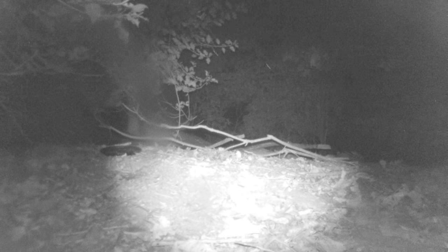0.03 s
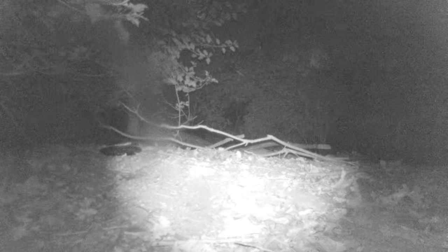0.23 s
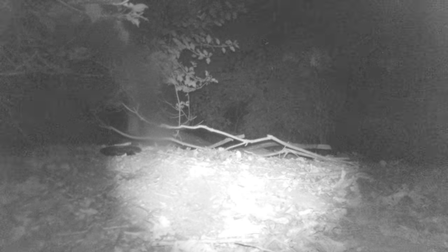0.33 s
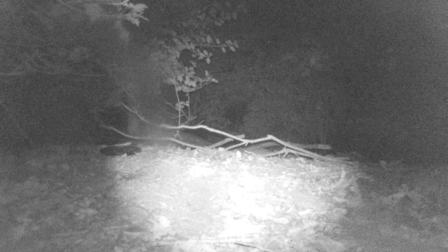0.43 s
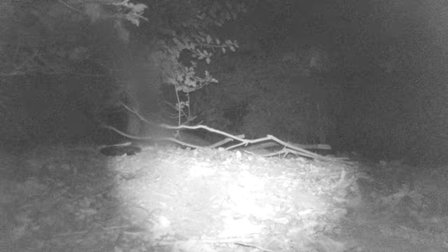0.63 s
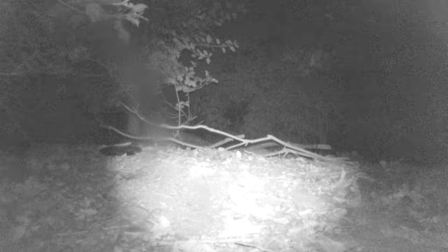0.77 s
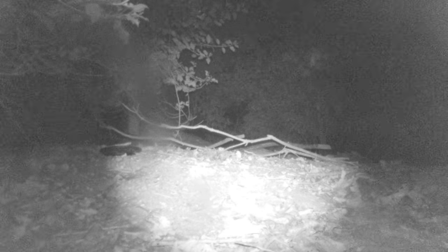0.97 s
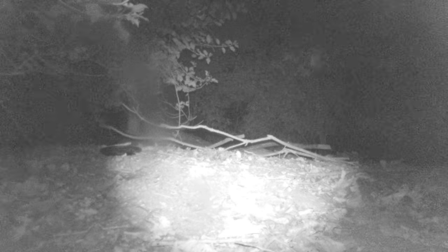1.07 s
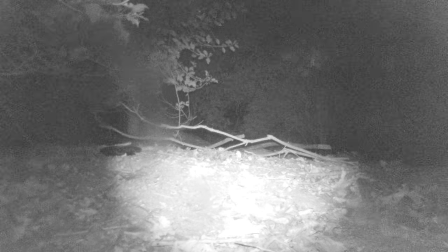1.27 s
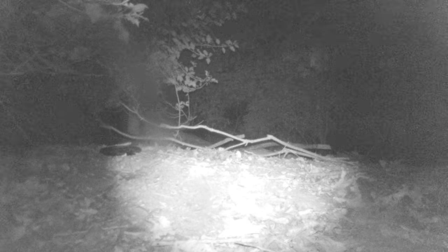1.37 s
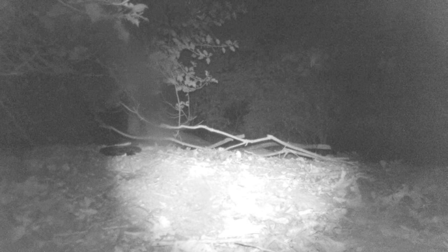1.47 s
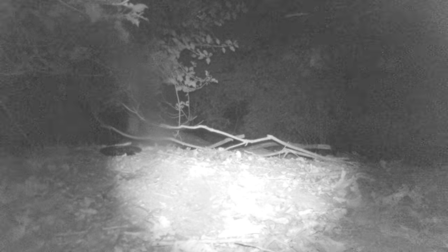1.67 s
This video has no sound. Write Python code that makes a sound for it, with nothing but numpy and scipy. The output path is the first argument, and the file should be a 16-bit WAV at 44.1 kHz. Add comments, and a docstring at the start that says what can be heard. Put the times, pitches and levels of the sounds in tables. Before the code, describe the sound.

Short, raspy squeals from squabbling badger cubs, then leaves rustling and twigs snapping.

```python
"""Badger cubs squabbling in a night wood

Yelps are quick pitch arches from unevenly beating vocal folds, part rasp, part squeal, with low
grunts and throat clicks between. Paws scuff dry leaves, snap twigs and thud on earth; trees scatter
a faint tail over steady hiss and hum. A small, close microphone rings near 5 kHz and passes little
above it; the loud yelps overload the recorder."""
import sys
import numpy as np
from scipy import signal
from scipy.fft import rfft, irfft
from scipy.io import wavfile
from scipy.ndimage import uniform_filter1d

SR = 44100
rng = np.random.default_rng(int(sys.argv[2]) if len(sys.argv) > 2 else 0)


def dump_mix(stems):
    """Bounce the given channels to the path in sys.argv[1] as a 16-bit WAV at rate SR."""
    frames = np.atleast_2d(stems).T  # one column per channel
    limited = np.clip(frames, -1, 1)  # hard clip at full scale
    pcm = np.round(limited * 32767).astype(np.int16)
    wavfile.write(sys.argv[1], SR, pcm)


N = 74970
TIME_S = np.arange(N) / SR


def voice(tilt_db_per_oct, contour, n_lines=24):
    """Folds beat unevenly; alternating strong and weak beats add half lines; air rasps in step."""
    # Throat and mouth response: (frequency [Hz], gain [dB])
    throat = [(200, -24.5), (400, -6.5), (700, -11), (1100, -6.5), (1500, -17), (1900, -5), (2350, -0.5),
              (2700, -4), (3200, -9), (3800, -13.5), (4450, -11), (5300, -32)]
    # Upper resonances that a wider gape lifts: (frequency [Hz], weight [dB])
    gape_band = [(2550, -25), (3050, 1.5)]
    # Rasping air: (frequency [Hz], level [dB])
    air_spectrum = [(60, -10), (500, -1.5), (1400, 1.5), (2300, 1.5), (3500, 5.5), (4700, 4.5), (5600, -18)]
    jitter, shimmer_db, rasp_gain = 0.069, 2.5, 0.72  # each scaled by roughness
    tremble_hz, tremble_rad, half_line_rough = 296, 0.51, 0.75
    waver_hz, waver_db, waver_rad = 40, 2, 0.45
    soft_below_db, pressed_db, edge_s = -12.5, 6, 0.00061

    knots_s, *columns = np.transpose(contour)
    size = SR // 8
    start = int(knots_s[0] * SR) - SR // 200
    t = TIME_S[start:start + size]
    pitch_hz, level_db, doubling, rough, gape_db = (np.interp(t, knots_s, c) for c in columns)
    pitch_hz = pitch_hz * (1 + jitter * rough * drift(tremble_hz, t.shape))
    phase = 2 * np.pi * np.cumsum(pitch_hz) / SR
    harmonic = np.arange(1, n_lines + 1)[:, None] / 2
    is_half = harmonic % 1 > 0
    line_hz = harmonic * pitch_hz

    # Soft sounds leave a nearly closed mouth: duller.
    bright_db = tilt_db_per_oct - 2.67 * np.maximum(soft_below_db - level_db, 0)
    line_db = db_at(throat, line_hz) + bright_db * np.log2(harmonic)
    line_db += waver_db * drift(waver_hz, line_hz.shape)
    line_db += gape_db * from_db(db_at(gape_band, line_hz))
    # A pressed, period-doubled voice loses its fundamental.
    line_db -= pressed_db * doubling * (harmonic <= 1) / harmonic
    gains = from_db(line_db) * np.where(is_half, doubling, 1) * (line_hz < SR / 6)
    gains /= np.sqrt(np.sum(gains ** 2, axis=0) / 2)
    lag_rad = rng.uniform(0, np.pi, (n_lines, 1)) + waver_rad * drift(waver_hz, line_hz.shape)
    lag_rad += tremble_rad * (rough + half_line_rough * is_half) * drift(tremble_hz, line_hz.shape)
    tone = np.sum(gains * np.cos(harmonic * phase + lag_rad), axis=0)
    tone *= from_db(shimmer_db * rough * drift(tremble_hz, t.shape))

    air = noise(air_spectrum)
    air = air[:size] + (from_db(gape_db) - 1) * colour(air, gape_band)[:size]
    air /= np.sqrt(uniform_filter1d(air ** 2, size=256))
    rasp = rasp_gain * rough * air * (1 + np.cos(phase / 2)) * from_db(bright_db)

    outside_s = np.maximum(0, np.maximum(knots_s[0] - t, t - knots_s[-1]))
    envelope = from_db(level_db) * np.exp(-(outside_s / edge_s) ** 2)
    out = np.zeros(N)
    out[start:start + size] = envelope * (tone + rasp) / np.sqrt(1 + rough ** 2)
    return out


def yelps():
    """Short, loud calls that rise and fall in pitch."""
    # Calls: (mouth tilt [dB/octave], contour); contour rows:
    # (time [s], pitch [Hz], level [dB], period doubling [0-1], roughness [0-1], gape [dB])
    calls = [ (-6.5, [(.2065, 856, -14.5, 0, 0.1, -7), (.2115, 1104, -12, 0.2, 0.04, -4),
             (.218, 792, -15, 0.06, 0.54, -3), (.227, 520, -21.5, 0, 0.42, 2)]),
             (-2.5, [(.2645, 1143, -12, 0.14, 0.26, 2), (.268, 1203, -4.5, 0.6, 0.7, -3),
             (.276, 1400, -7, 1, 0.41, -1.5), (.286, 1404, -3.5, 0.37, 0.42, -2.5),
             (.295, 1180, -7.5, 0, 0.07, 8.5), (.301, 1120, -9, 0.24, 0.34, 8),
             (.312, 550, -36, 0, 0.7, 10)]), (-2.5, [(.355, 846, -26.5, 0, 0.1, 20),
             (.364, 1065, -5.5, 0, 0.16, -11), (.375, 1308, -7, 0.08, 0.25, 21),
             (.382, 1063, -6.5, 0.26, 0.17, -10), (.388, 920, -15.5, 0.07, 0.14, -19)]),
             (-1.5, [(.5695, 1225, -4.5, 0, 0.37, -17), (.5715, 1292, -8.5, 0.2, 0.16, 16.5),
             (.579, 1218, -4, 0, 0.2, 0.5), (.585, 1084, -5.5, 0.9, 0, -6),
             (.588, 970, -18.5, .2, 0.3, 14.5)]), (-3.5, [(.6165, 1066, -7, 1, 0.55, -11),
             (.619, 1113, -4, 1, 0.77, -10), (.627, 1131, -6.5, 0.97, 0.54, 1),
             (.638, 1284, -3.5, 0.65, 0.03, 5), (.656, 1222, -5.5, 1, 0.05, 7),
             (.665, 1081, -5, 1, 0.37, -5), (.670, 875, -17.5, .3, 0.4, 20), (.686, 398, -39.5, 0, .2, 2)]),
             (2.5, [(.7015, 1098, -26, 1, 0.1, -10), (.7035, 1150, -6, 1, 0.16, -13),
             (.713, 1125, -7.5, 0.7, 0.3, -1), (.723, 1245, -4.5, 0.2, 0, -6),
             (.735, 1085, -9.5, 0.1, .1, 5), (.740, 1023, -11, 0, 0.3, -8.5),
             (.746, 800, -34, 0.2, .2, -4)]), (-2.5, [(.776, 948, -14.5, 1, 0.7, 8.5),
             (.788, 1176, -10.5, 0.8, 0.66, 7.5), (.796, 1315, -12.5, 0.72, .5, 5),
             (.805, 1344, -8, 0, 0, 2), (.811, 1168, -12.5, 0.13, 0, 7), (.818, 957, -18.5, 0.06, 0, -5),
             (.822, 555, -24, 0, .3, -5)]), (1.5, [(.874, 1000, -16, 0.93, 0, 8.5),
             (.879, 1018, -10, 0.9, 0.48, -3), (.888, 1174, -9, 1, 0.22, 9.5),
             (.896, 1241, -10, 1, 0.55, 2), (.906, 1267, -5.5, 0.3, 0.03, -3.5),
             (.915, 1100, -16, .05, 0.2, 8), (.926, 486, -27, 0, 0.36, 7)]), ]
    return sum(voice(tilt, contour) for tilt, contour in calls)


def grunts():
    """Low, rough glides that fade as they go."""
    # Glides: (time [s], length [s], first pitch [Hz], last pitch [Hz], level [dB])
    glides = [(0.587, .016, 495, 387, -10.5), (0.742, 0.017, 637, 361, -16.5),
              (0.76, 0.027, 326, 475, -18.5), (0.995, .016, 535, 392, -33.5)]
    tilt_db_per_oct, rough, fade_db = 1, 0.62, 9.5
    out = np.zeros(N)
    for start_s, length_s, first_hz, last_hz, level_db in glides:
        first = (start_s, first_hz, level_db, 0, rough, 0)
        last = (start_s + length_s, last_hz, level_db - fade_db, 0, rough, 0)
        out += voice(tilt_db_per_oct, [first, last])
    return out


def throat_clicks():
    """Lone clicks ring two mouth resonances before the longest squeal."""
    # Clicks: (time [s], level [dB])
    clicks = [(.5995, -5.5), (.6065, -10), (.6120, -5)]
    # Mouth resonances: (frequency [Hz], gain [dB], decay [s])
    modes = [(2060, 1.5, 0.0015), (3660, -4, 0.0029)]
    return sum(from_db(db) * pings(clicks, hz, decay_s) for hz, db, decay_s in modes)


def leaves():
    """Paws push through leaves: each scuff swells and fades, bright crackle over dull crunch."""
    # Scuffs: (time [s], level [dB], rise [s], decay [s], crunch re crackle [dB])
    scuffs = [ (.005, -31.5, 0.038, 0.067, 3.5), (0.053, -29.5, 0.015, 0.039, 1),
              (0.121, -24.5, 0.0031, 0.0056, -13), (0.165, -25, 0.0021, 0.0071, 0),
              (0.187, -22.5, 0.0042, 0.024, -5.5), (0.254, -25, 0.021, 0.076, 0.5),
              (0.328, -31.5, 0.018, 0.0073, -9), (0.395, -28, 0.037, 0.014, -6.5),
              (0.508, -26.5, 0.028, 0.025, -2.5), (0.561, -22, 0.0069, 0.028, -2.5),
              (0.598, -27.5, 0.0055, 0.013, 7.5), (0.684, -17.5, 0.011, 0.0091, -5),
              (0.761, -36, .02, 0.08, -19.5), (0.839, -34.5, 0.063, 0.031, 1.5),
              (0.961, -30.5, 0.038, 0.031, -1), (1.019, -31.5, 0.024, 0.01, 0),
              (1.11, -17.5, .003, 0.0042, -22.5), (1.133, -23, 0.025, 0.041, -0.5),
              (1.206, -19.5, 0.04, 0.011, -2.5), (1.250, -25, 0.045, 0.036, 0.5),
              (1.299, -29, 0.018, 0.034, 1), (1.355, -19.5, 0.013, 0.039, 1),
              (1.412, -31.5, 0.008, 0.053, 4.5), (1.462, -26, 0.015, 0.021, -5.5),
              (1.517, -34.5, 0.0081, 0.024, -2.5), (1.57, -31.5, 0.015, 0.011, -1),
              (1.614, -29.5, 0.023, 0.041, -2.5), (1.663, -28.5, 0.027, 0.034, -2)]
    # Bright crackle: (frequency [Hz], level [dB])
    crackle_spectrum = [(1000, -20.5), (2500, -23), (3700, 2), (4700, 8.5), (6000, -10.5)]
    # Dull crunch: (frequency [Hz], level [dB])
    crunch_spectrum = [(60, -20.5), (200, -8.5), (700, -4), (1300, 1), (2400, 1), (3500, 0.5), (5000, -25)]
    peak_s, level_db, rise_s, decay_s, crunch_db = np.transpose(scuffs)[:, :, None]
    age_s = TIME_S - peak_s
    swells = from_db(level_db) * np.exp(-np.maximum(-age_s / rise_s, age_s / decay_s))
    crackle = np.linalg.norm(swells, axis=0) * fractures(crackle_spectrum)
    crunch = np.linalg.norm(swells * from_db(crunch_db), axis=0) * fractures(crunch_spectrum)
    return crackle + crunch


def fractures(spectrum, rate_per_s=2500, spread_db=5.5, hiss_gain=0.58):
    """Tiny leaf fractures of uneven size over a soft rubbing hiss; rms 1."""
    sizes = from_db(spread_db * np.minimum(rng.exponential(1, N), 3)) * rng.choice([-1, 1], N)
    clicks = unit_rms(sizes * (rng.random(N) < rate_per_s / SR))
    return unit_rms(colour(clicks + hiss_gain * rng.standard_normal(N), spectrum))


def twigs():
    """Twigs and stiff leaves snap with a bright tick."""
    # Snaps: (time [s], level [dB])
    snaps = [(.0590, -9), (.0855, -9.5), (1.0829, -5.5), (1.1084, -16.5), (1.2076, -5.5), (1.233, -6.5),
             (1.2498, -5), (1.3415, -5.5), (1.3774, -9.5), (1.4367, -6), (1.5075, -11.5)]
    return pings(snaps, hz=4435, decay_s=0.00043)


def steps(half_width_s=0.006):
    """Paws land on earth with a soft, dull thud."""
    # Footfalls: (time [s], level [dB])
    footfalls = [(.168, -37.5), (.530, -36)]
    # Earth thud: (frequency [Hz], level [dB])
    earth_spectrum = [(70, -16), (170, -2), (280, -3), (600, -37)]
    envelope = sum(from_db(db) * np.exp(-((TIME_S - s) / half_width_s) ** 2) for s, db in footfalls)
    return noise(earth_spectrum) * envelope


def tree_scatter(x, gain_db=-18, t60_s=0.31, build_s=0.00033):
    """Trunks and foliage return a faint, diffuse tail."""
    # Scattered sound: (frequency [Hz], level [dB])
    tail_spectrum = [(200, -19), (1200, -5.5), (2500, 5), (4500, 6.5), (6000, -2)]
    tail = noise(tail_spectrum) * from_db(-60 * TIME_S / t60_s) * (1 - np.exp(-TIME_S / build_s))
    return from_db(gain_db) * signal.fftconvolve(x, tail / np.linalg.norm(tail))[:N]


def background(hiss_db=-37, hum_hz=73.4, hum_db=-65):
    """Steady hiss with a faint low hum."""
    # Night hiss: (frequency [Hz], level [dB])
    hiss_spectrum = [(25, -4), (70, 5), (110, -2), (200, -4.5), (500, -1), (1200, -4), (2500, -0.5),
                     (4500, 1.5), (6000, -12.5)]
    hum = np.sqrt(2) * np.sin(2 * np.pi * hum_hz * TIME_S)
    return from_db(hiss_db) * noise(hiss_spectrum) + from_db(hum_db) * hum


def pings(hits, hz, decay_s):
    """Each impulse (time [s], level [dB]) rings one resonance."""
    out = np.zeros(N)
    for start_s, level_db in hits:
        age_s = np.maximum(TIME_S - start_s, 0)
        out += from_db(level_db) * np.exp(-age_s / decay_s) * np.sin(2 * np.pi * hz * age_s)
    return out


def from_db(db):
    """Decibels to gain."""
    return 10 ** (np.asarray(db) / 20)


def unit_rms(x):
    """Scale to rms 1."""
    return x / np.sqrt(np.mean(x ** 2) + 1e-20)


def db_at(spectrum, hz):
    """Interpolate a spectrum on a log-frequency axis."""
    knots_hz, knots_db = np.transpose(spectrum)
    return np.interp(np.log(np.maximum(hz, 1)), np.log(knots_hz), knots_db)


def colour(x, spectrum):
    """Filter by a smooth spectrum."""
    bins_hz = np.arange(N + 1) * SR / (2 * N)
    return irfft(rfft(x, 2 * N) * from_db(db_at(spectrum, bins_hz)))[:N]


def noise(spectrum):
    """Coloured noise; rms 1."""
    return unit_rms(colour(rng.standard_normal(N), spectrum))


def drift(cutoff_hz, shape):
    """Smooth random wander along the last axis; rms about 1."""
    white = rng.standard_normal((*shape[:-1], shape[-1] + 2000))  # extra samples settle the filter
    slow = signal.sosfilt(signal.butter(2, cutoff_hz, fs=SR, output="sos"), white)
    return slow[..., -shape[-1]:] * np.sqrt(SR / (2 * cutoff_hz))


def scene():
    """Cubs and leaf litter among the trees; mono."""
    cubs = yelps() + grunts() + throat_clicks() + leaves() + twigs()
    return (cubs + tree_scatter(cubs) + background() + steps())[None]


def record(dry):
    """A ringing, narrow-band microphone feeds an input that overloads lopsidedly and thumps."""
    ring_hz, ring_width_hz, ring_db = 4922, 630, 8.5
    mic_top_hz, mic_stop_hz, recorder_top_hz = 5750, 6600, 15800
    ceiling, knee, bias, dc_offset = 0.735, 16, 0.015, 0.03
    slew_limit_per_sample, thump_db, thump_top_hz = 0.28, 1, 225
    ring = signal.lfilter(*signal.iirpeak(ring_hz, ring_hz / ring_width_hz, fs=SR), dry)
    mic = dry + (from_db(ring_db) - 1) * ring
    mic = signal.sosfilt(signal.butter(14, mic_top_hz, fs=SR, output="sos"), mic)
    mic = signal.sosfilt(signal.cheby2(20, 60, mic_stop_hz, fs=SR, output="sos"), mic)
    biased = mic + bias
    clipped = biased / (1 + np.abs(biased / ceiling) ** knee) ** (1 / knee) - bias
    # Slopes past the slew limit make the input thump.
    slew = np.abs(np.gradient(mic, axis=1))
    excess = uniform_filter1d(np.maximum(slew - slew_limit_per_sample, 0), size=256)
    thump = from_db(thump_db) * excess / (1 + excess) * drift(thump_top_hz, mic.shape)
    lowpass = signal.firwin(255, recorder_top_hz, fs=SR, window="blackman")[None]
    return signal.fftconvolve(clipped + thump, lowpass, "same") + dc_offset


dry = scene()
out = record(dry)
dump_mix(out)
```